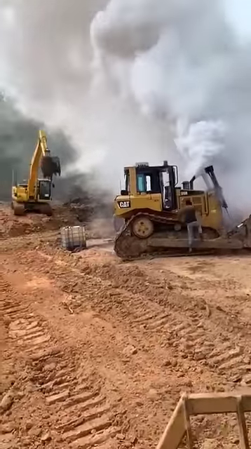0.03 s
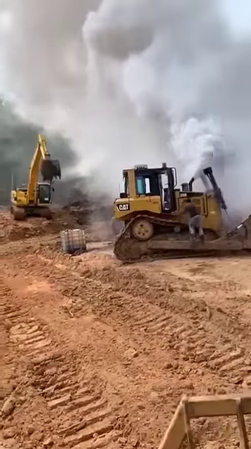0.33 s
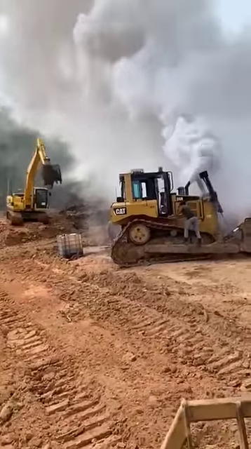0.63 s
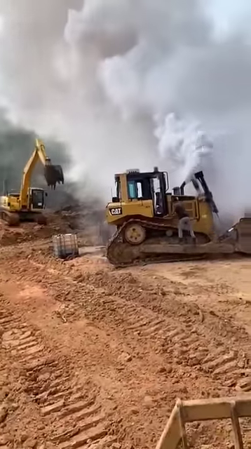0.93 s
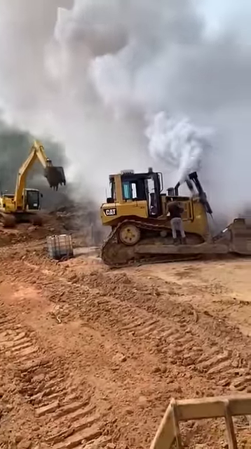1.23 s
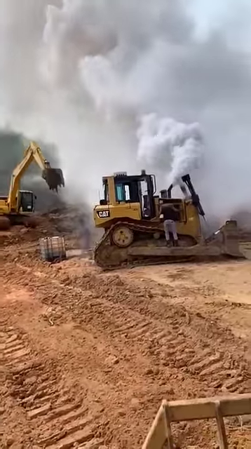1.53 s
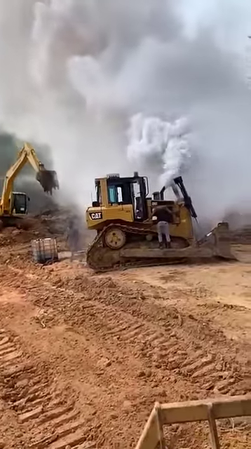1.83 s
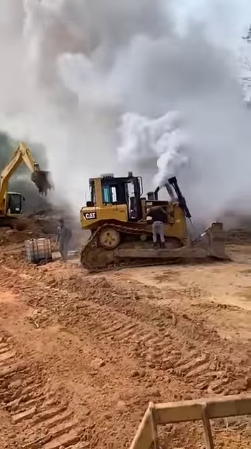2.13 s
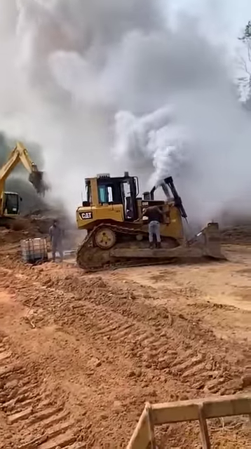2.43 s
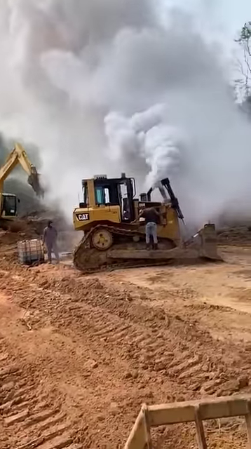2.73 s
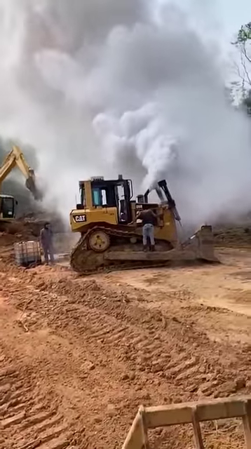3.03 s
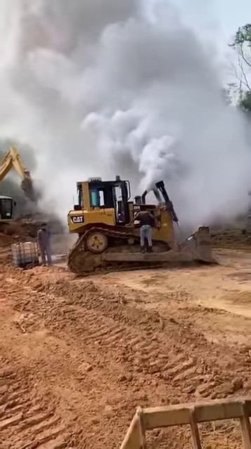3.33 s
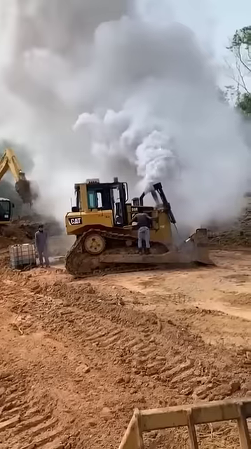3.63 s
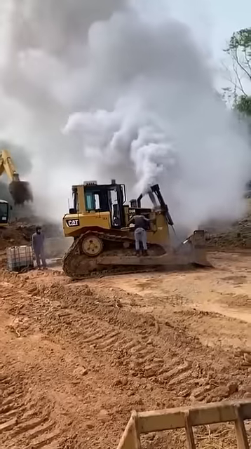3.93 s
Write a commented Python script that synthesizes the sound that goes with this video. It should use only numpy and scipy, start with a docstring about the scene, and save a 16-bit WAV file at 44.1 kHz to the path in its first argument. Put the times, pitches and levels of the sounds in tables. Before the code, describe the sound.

A bulldozer's diesel engine holds a steady, raised speed on an open dirt site straight ahead. Its exhaust drones over uneven knocking, metallic chatter and rushing fan air, while an excavator hums farther off.

```python
"""Bulldozer running on a dirt site

A six-cylinder diesel holds a steady, raised speed. Its exhaust drones, its cylinders knock
unevenly and ring the block, its covers chatter and its valve gear clatters, with the odd thud
and a buzzing guard. Fan air roars and hisses around it. An excavator's faster engine and
the cooling fans hum alongside and beat against the exhaust."""
import sys
import numpy as np
from scipy import signal
from scipy.fft import rfft, irfft, next_fast_len
from scipy.io import wavfile
from scipy.ndimage import uniform_filter1d, map_coordinates

SR = 44100
rng = np.random.default_rng(int(sys.argv[2]) if len(sys.argv) > 2 else 0)


def persist_wave(psi):
    """Save psi, clipped to +-1, as 16-bit WAV."""
    counts = np.round(np.clip(psi, -1, 1) * 32767).astype(np.int16)
    wavfile.write(sys.argv[1], SR, np.atleast_2d(counts).T)


N = 176400
CYCLE_HZ = 9.33  # one engine cycle is two crank turns: every cylinder fires once


# Body of the exhaust drone: firing_harmonic, level_db
PUFF_HARMONICS = [(1, -28), (2, -30), (3, -47.5), (4, -41.5)]
# Roughness from the uneven cylinders: cycle_harmonic, level_db
UNEVEN_ORDERS = [(7, -43.5), (11, -41), (13, -46), (15, -43), (16, -42.5), (17, -41.5), (24, -42),
                 (34, -46), (42, -42), (48, -44), (51, -43), (54, -44.5), (58, -47), (66, -46)]

def exhaust():
    """One puff per firing makes the drone; uneven cylinders add weaker orders of the whole cycle."""
    firing_hz = len(CYLINDER_DB) * CYCLE_HZ
    puffs = pulse_tone(firing_hz, 0.00023, PUFF_HARMONICS, waver_db=0.2, drift_cycles=0.0078)
    roughness = sum(tone(k * CYCLE_HZ, db, waver_db=2.6, drift_cycles=0.014) for k, db in UNEVEN_ORDERS)
    return puffs + roughness


# Weight of each cylinder's knock, in firing order: relative_db
CYLINDER_DB = [1, -0.48, -1.5, -1.1, 0.23, 0.43]
# Colour of the knock through the block: frequency_hz, relative_db
BLOCK_COLOUR = [(70, -84), (140, -59.5), (250, -55), (400, -60), (560, -58.5), (660, -68), (800, -67),
                (980, -71.5), (1130, -66), (1300, -71), (1450, -65.5), (1560, -65.5), (1700, -63.5),
                (1950, -77.5), (2300, -84), (3500, -95), (5000, -110)]

def knock():
    """Every cylinder shakes the block in its own way, with a rattle that repeats each cycle."""
    size = round(SR / CYCLE_HZ)
    patterns = irfft(np.exp(2j * np.pi * rng.random((2, size // 2 + 1))), size)  # white noise loops
    place = (clock() * CYCLE_HZ % 1) * size
    rattle = np.array([np.interp(place, np.arange(size), loop) for loop in patterns])
    firings = [(0.00526 + k / len(CYLINDER_DB) / CYCLE_HZ, db) for k, db in enumerate(CYLINDER_DB)]
    force = blows(firings, rise_s=0.00062, decay_s=0.019, scatter_db=0.3)
    return amp(-30) * spread(rattle * force, lambda hz: along(BLOCK_COLOUR, hz) + panel_lift(hz))


# Slaps on the covers within each cycle: start_s, relative_db
COVER_SLAPS = [(.002, -4.5), (.024, -1.5), (.056, 1.5), (.081, -10), (.096, 2.5)]
# Ringing notes of the covers: cycle_harmonic, level_db
COVER_NOTES = [(150, -52.5), (152, -40), (158, -43.5), (161, -45.5)]
# Fader ride on the ringing: time_s, gain_db
COVER_RIDE = [(0, -3), (.3, -1.5), (.55, -2), (1.35, 4), (1.5, -1.5), (1.85, 0), (2.25, 2), (2.55, 6),
              (2.7, 2), (3, 0.5), (3.25, 3), (3.6, -4), (4, 1)]

def covers(crest_s=0.0095):
    """Uneven slaps ring the engine covers: a metallic chatter."""
    force = blows(COVER_SLAPS, rise_s=0.0062, decay_s=0.011, scatter_db=1.5)
    ring = 0
    for k, db in COVER_NOTES:
        cycles = k * CYCLE_HZ * (clock() - crest_s) + 0.051 * wobble(30)
        ring += np.sqrt(2) * amp(db) * np.sin(2 * np.pi * cycles)
    return amp(ride(COVER_RIDE)) * force * ring


# Valve and injector ticks within each cycle: start_s, relative_db
VALVE_TICKS = [(.002, -3), (0.019, -1), (.031, -4), (.061, -3), (.074, -1.5), (0.086, -5), (.101, -2)]
# Colour of the small parts they ring: frequency_hz, relative_db
PARTS_COLOUR = [(500, -1), (800, -0.5), (1200, 1.5), (1700, 2), (2100, -5), (2400, -6), (2900, -7),
                (4000, -13), (5000, -13)]

def valve_clatter(parts=6, decay_s=0.023, scatter_db=3.5, jitter_s=0.004):
    """Every tick of the valve gear briefly rings a few small parts, other ones each time."""
    ticks = [(cycle_s + s, db) for cycle_s in np.arange(0, N / SR, 1 / CYCLE_HZ) for s, db in VALVE_TICKS]
    t = np.arange(SR // 10) / SR
    pair = np.zeros((2, N + SR))
    for start_s, db in ticks:
        for channel in pair:
            pitch_hz = rng.uniform(699.9, 4397, (parts, 1))
            strength = amp(db + scatter_db * rng.standard_normal((parts, 1)))
            rings = strength * np.sin(2 * np.pi * (pitch_hz * t + rng.random((parts, 1))))
            at = round(abs(start_s + jitter_s * rng.standard_normal()) * SR)
            channel[at:at + len(t)] += rings.sum(0) * np.exp(-t / decay_s)
    return amp(-34.5) * spread(pair[:, :N], lambda hz: along(PARTS_COLOUR, hz) + panel_lift(hz))


# The hardest single knocks: start_s, gain_db
HARD_KNOCKS = [(0.473, -17), (2.375, -16), (2.607, -11.5), (2.945, -18), (3.041, -15), (3.142, -15),
               (3.339, -27), (3.482, -15)]
# Low, damped notes of the chassis: pitch_hz, relative_db, decay_s
CHASSIS_MODES = [(127, -4, 0.0078), (235, -4, .006), (373.7, -5, 0.0072)]

def thumps():
    """Now and then a harder knock thuds through the chassis."""
    t = np.arange(SR // 10) / SR
    thud = sum(amp(db) * np.sin(2 * np.pi * hz * t) * np.exp(-t / decay_s)
               for hz, db, decay_s in CHASSIS_MODES)
    track = np.zeros(N + SR)
    for start_s, db in HARD_KNOCKS:
        at = round(start_s * SR)
        track[at:at + len(t)] += amp(db) * thud
    return track[:N]


# Buzzing bands of a loose guard: centre_hz, width_hz, level_db
GUARD_BANDS = [(2583, 79, -48.5), (2800, 43, -47)]

def guard(flare_db=3):
    """The thin metal of a loose guard buzzes in short random flares."""
    flare = unit(amp(flare_db * wobble(19)))
    buzz = 0
    for centre_hz, width_hz, db in GUARD_BANDS:
        noise = rng.standard_normal((2, N))
        buzz += amp(db) * spread(noise, lambda hz: -20 * np.log10(1 + ((hz - centre_hz) / width_hz) ** 2))
    return flare * buzz


# Colour of the fan air and exhaust turbulence: frequency_hz, relative_db
ROAR_COLOUR = [(20, -68), (40, -59), (60, -49), (110, -53.5), (170, -52), (300, -53), (480, -55.5),
               (650, -62.5), (950, -64.5), (1150, -64.5), (1430, -59.5), (1560, -67.5), (1900, -70.5),
               (2300, -70.5), (2800, -76), (3200, -76.5), (4500, -77.5), (4950, -86), (5500, -105)]
# Colour of the hiss on top: frequency_hz, relative_db
HISS_COLOUR = [(2000, -106), (4000, -97), (4900, -110), (5150, -104.5), (5550, -94), (5700, -76.5),
               (5920, -79.5), (6600, -85), (8200, -87.5), (9800, -86), (10500, -95.5), (11300, -103)]
# Fader ride on the hiss: time_s, gain_db
HISS_RIDE = [(0.04, -53), (0.05, -52.5), (0.91, -52.5), (0.94, -48.5), (1.01, -55), (1.03, -49),
             (1.08, -54), (1.15, -54), (1.17, -49), (1.2, -52.5), (1.29, -52.5), (1.3, -48), (1.34, -54),
             (1.39, -50.5), (1.65, -53.5), (1.71, -50), (1.79, -55), (1.92, -51.5), (2.08, -53),
             (2.26, -51), (2.48, -53.5), (2.51, -50), (2.59, -48), (2.62, -55), (2.65, -48.5), (2.74, -52),
             (2.94, -50), (2.96, -46), (2.99, -51.5), (3.51, -51), (3.7, -52), (3.74, -48.5), (3.94, -51.5),
             (3.95, -51)]

def fan_air(hiss_trim_db=1.78, swell_crest_s=0.091):
    """Fan air roars through the panels; the hiss above it flutters and swells once an engine cycle."""
    roar = spread(turbulence(patchy_db=1.5), lambda hz: along(ROAR_COLOUR, hz) + panel_lift(hz))
    hiss = spread(turbulence(patchy_db=2.5), lambda hz: along(HISS_COLOUR, hz))
    swell_db = 0.5 * np.cos(2 * np.pi * CYCLE_HZ * (clock() - swell_crest_s))
    flutter_db = 1.44 * wobble(40)
    hiss_db = ride(HISS_RIDE) + hiss_trim_db + swell_db + flutter_db
    roar_db = -24.5 - 0.48 * wobble(4.4)
    return amp(roar_db) * roar + amp(hiss_db) * hiss


# Blade hum of the fans and drives: pitch_hz, first_blade_s, level_db, octave_level_db
BLADE_HUMS = [(106.37, 0.0068, -31, -39.5), (155.4, 0.0029, -38, -49), (173.7, 0.00475, -32.5, -54)]

def fan_hum():
    """Each fan or drive hums with its octave; beats against the two exhausts make the drone throb."""
    return sum(pulse_tone(hz, first_s, [(1, db), (2, octave_db)], waver_db=0.8, drift_cycles=0.033)
               for hz, first_s, db, octave_db in BLADE_HUMS)


# Drone of the excavator's exhaust: firing_harmonic, level_db
EXCAVATOR_HARMONICS = [(1, -28.5), (2, -36.5), (3, -36.5), (4, -37), (5, -44)]

def excavator(firing_hz=91.47):
    """A faster engine farther off: only its firing pulses carry."""
    return pulse_tone(firing_hz, 0.008, EXCAVATOR_HARMONICS, waver_db=0.9, drift_cycles=0.01)


# Resonances of the hood and side panels: centre_hz, width_hz, lift_db
PANEL_MODES = [(307, 12, 1.5), (600, 29, 4.5), (690, 19, 6), (788, 33, 6.5), (881, 22, 4.5),
               (1120, 50, 5.5), (1257, 27, 3), (1370, 36, 1.5), (1480, 33, 5.5), (1657, 80, 2.5),
               (1837, 41, 5), (1954, 49, 6.5), (2024, 38, 6)]

def panel_lift(hz):
    """Lift in dB that the ringing panels give each frequency."""
    return sum(db / (1 + (2 * (hz - centre) / width) ** 2) for centre, width, db in PANEL_MODES)


# Likeness of left and right, where 1 is mono: frequency_hz, likeness
STEREO_LIKENESS = [(100, .999), (160, 1), (250, 0.99), (400, 0.9), (630, 0.64), (1000, 0.55), (1500, 0.77),
                   (2600, 0.45), (4200, .24), (6700, 0.56), (10700, 0.68)]

def spread(pair, colour_db):
    """Two unrelated signals become a coloured left and right, mono in the bass, with a mid of rms 1."""
    def mid_side_gains(hz):
        angle = np.arccos(np.clip(along(STEREO_LIKENESS, hz), 0, 1)) / 2
        return amp(colour_db(hz)) * np.array([np.ones_like(hz), np.tan(angle)])
    mid, side = filtered(pair, mid_side_gains)
    return np.array([mid + side, mid - side]) / mid.std()


def blows(strikes, rise_s, decay_s, scatter_db):
    """Envelope (rms 1) of strikes that return every cycle: each rises, dies and varies in strength."""
    power = 0
    for start_s, db in strikes:
        age = (clock() - start_s) % (1 / CYCLE_HZ)
        strength = amp(db + scatter_db * wobble(CYCLE_HZ))
        power += (strength * (1 - np.exp(-age / rise_s)) * np.exp(-age / decay_s)) ** 2
    return unit(np.sqrt(power))


def pulse_tone(hz, first_s, harmonics, waver_db, drift_cycles):
    """Rounded pulses at a near-steady rate: all harmonics crest together."""
    cycles = hz * (clock() - first_s) + drift_cycles * wobble(2.96)
    return sum(np.sqrt(2) * amp(db + waver_db * wobble(7.6)) * np.cos(2 * np.pi * k * cycles)
               for k, db in harmonics)


def tone(hz, db, waver_db, drift_cycles):
    """A held sine whose level and phase waver a little."""
    cycles = hz * clock() + rng.random() + drift_cycles * wobble(2.77)
    return np.sqrt(2) * amp(db + waver_db * wobble(4.81)) * np.sin(2 * np.pi * cycles)


def turbulence(patchy_db):
    """Two noises that share drifting patches of louder and softer sound."""
    spectra = signal.stft(rng.standard_normal((2, N)), nperseg=1024)[2]
    patches = uniform_filter1d(rng.standard_normal(spectra.shape[1:]), size=5, axis=0)  # across pitch
    patches = uniform_filter1d(patches, size=7, axis=1)  # across time
    return signal.istft(spectra * amp(patchy_db * unit(patches)), nperseg=1024)[1][:, :N]


def wobble(rate_hz):
    """A smooth random curve through rate_hz points a second."""
    points = rng.standard_normal(int(N * rate_hz / SR) + 4)
    return map_coordinates(points, [clock() * rate_hz], mode="nearest")


def filtered(x, response):
    """EQ with a gain given as a function of frequency."""
    size = next_fast_len(N + SR // 2)
    return irfft(rfft(x, size) * response(np.fft.rfftfreq(size, 1 / SR)), size)[..., :N]


def along(points, hz):
    """A curve of (frequency_hz, value) points, read on a log axis."""
    frequencies, values = np.transpose(points)
    return np.interp(np.log(hz + 1), np.log(frequencies + 1), values)


def ride(points):
    """Fader position in dB at every sample, from (time_s, gain_db) points."""
    return np.interp(clock(), *np.transpose(points))


def amp(db):
    """Decibels to gain."""
    return 10 ** (np.asarray(db) / 20)


def unit(x):
    """Scaled to rms 1."""
    return x / np.sqrt(np.mean(x ** 2) + 1e-20)


def clock():
    """Time of every sample in seconds."""
    return np.arange(N) / SR


def scene(balance_db=0.12):
    """Both machines in the open, almost straight ahead."""
    bulldozer = exhaust() + knock() + thumps() + valve_clatter() + covers() + guard() + fan_air()
    site = bulldozer + excavator() + fan_hum()
    return site * amp([[-balance_db], [balance_db]])


def record(dry, cutoff_hz=11310):
    """A brick-wall low-pass takes off the very top."""
    return filtered(dry, lambda hz: hz < cutoff_hz)


dry = scene()
out = record(dry)
persist_wave(out)
```